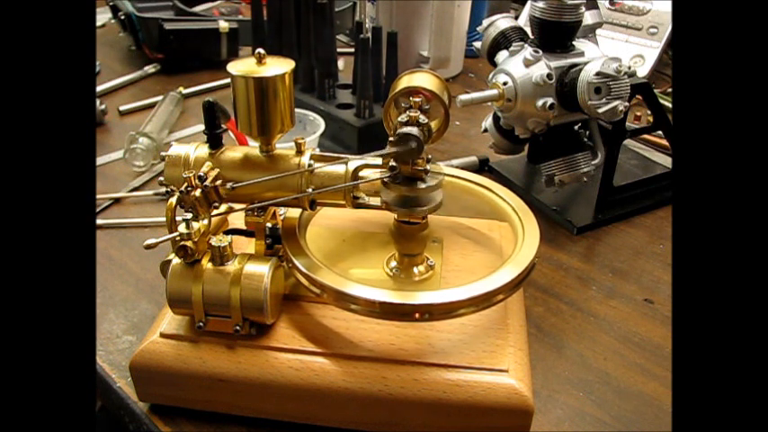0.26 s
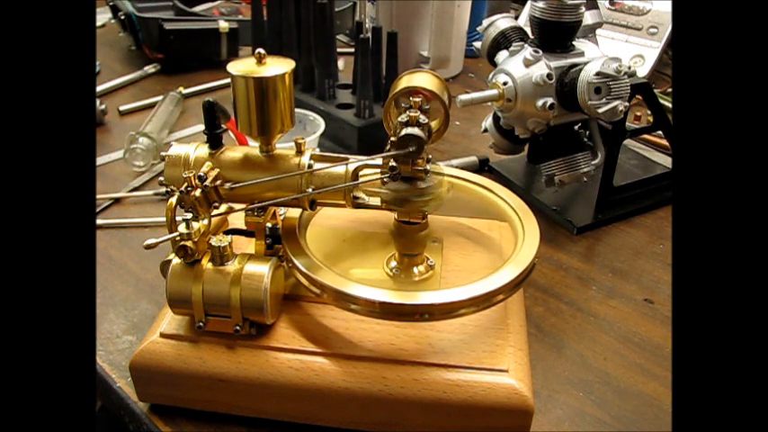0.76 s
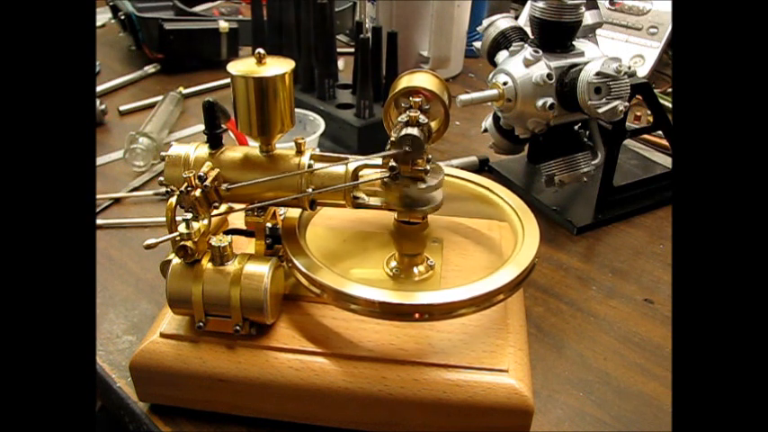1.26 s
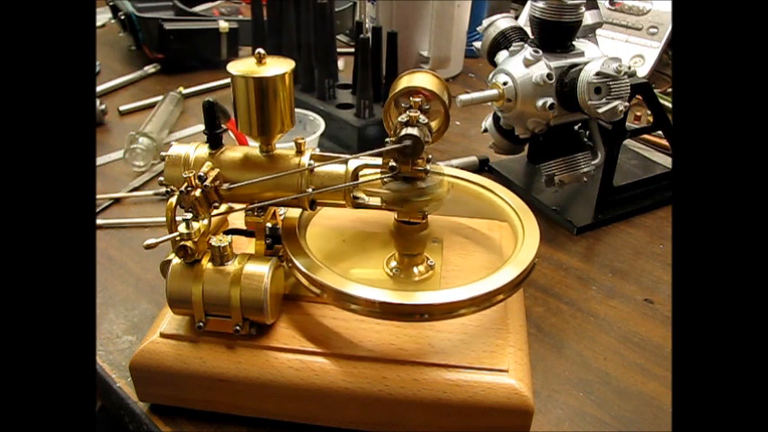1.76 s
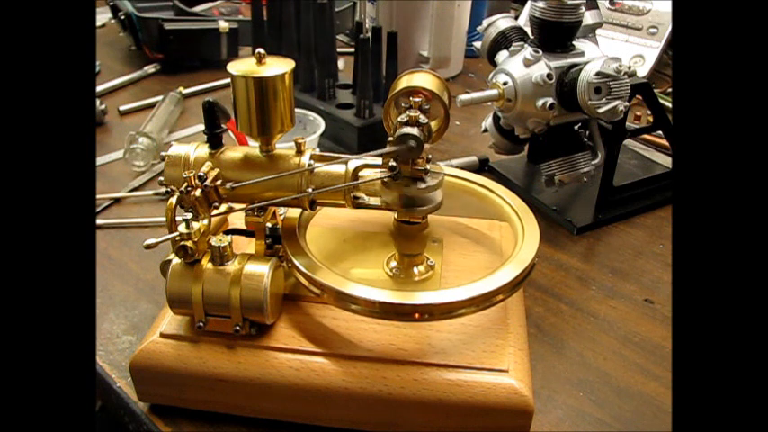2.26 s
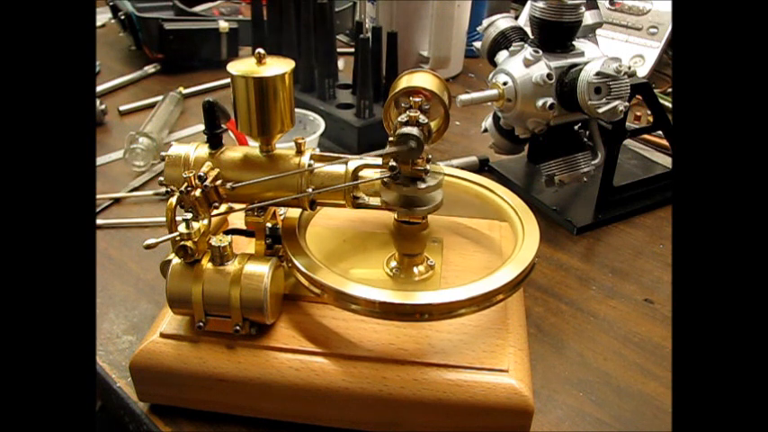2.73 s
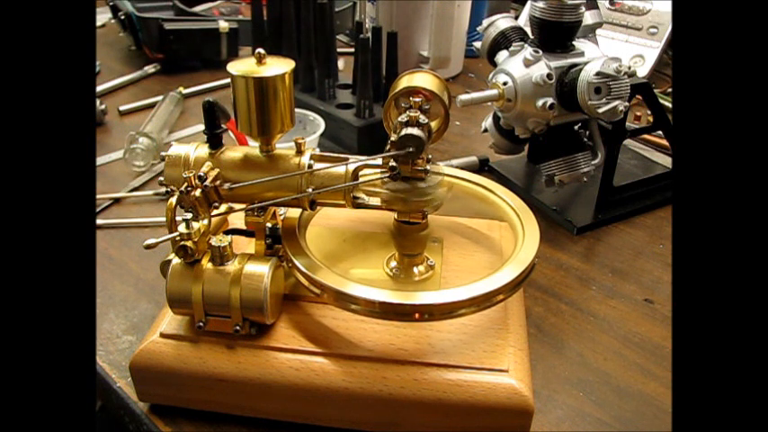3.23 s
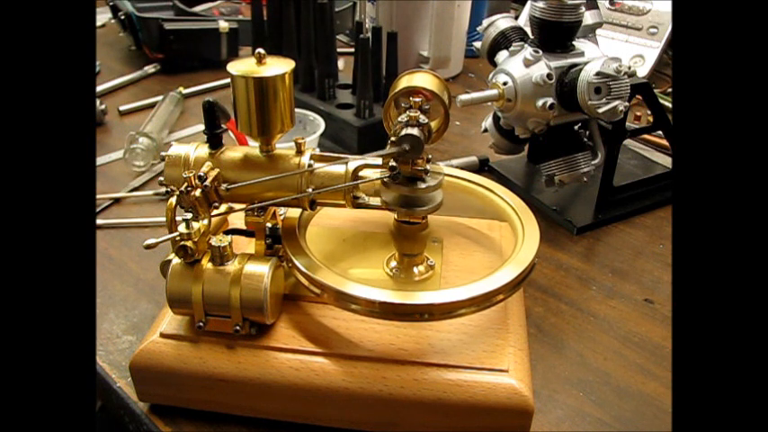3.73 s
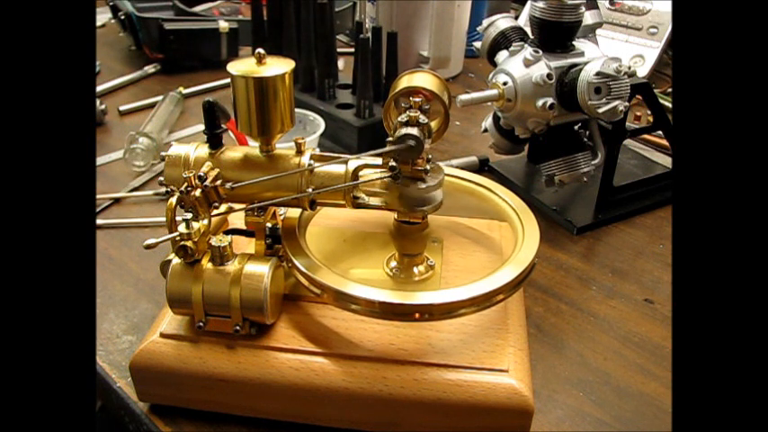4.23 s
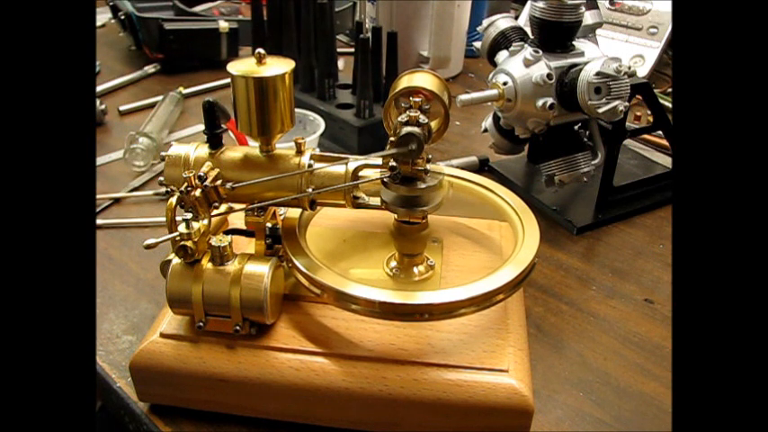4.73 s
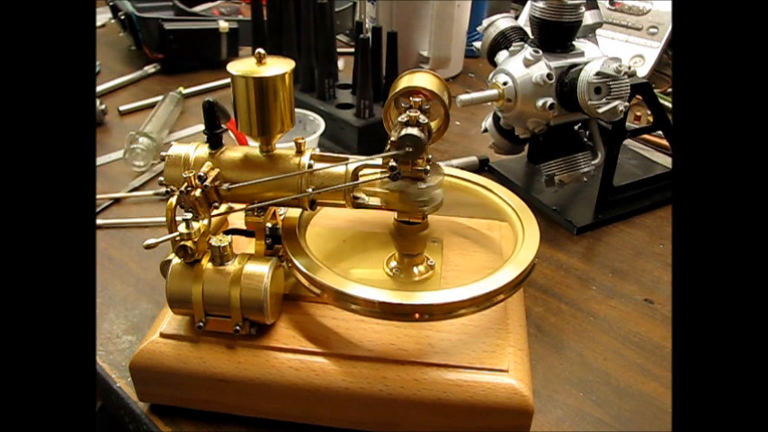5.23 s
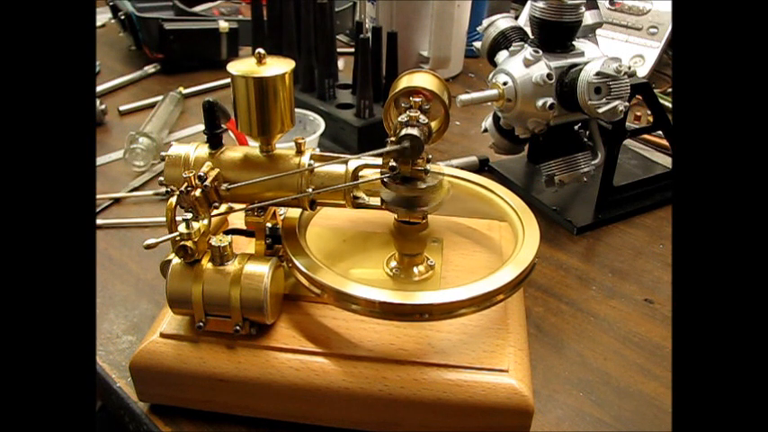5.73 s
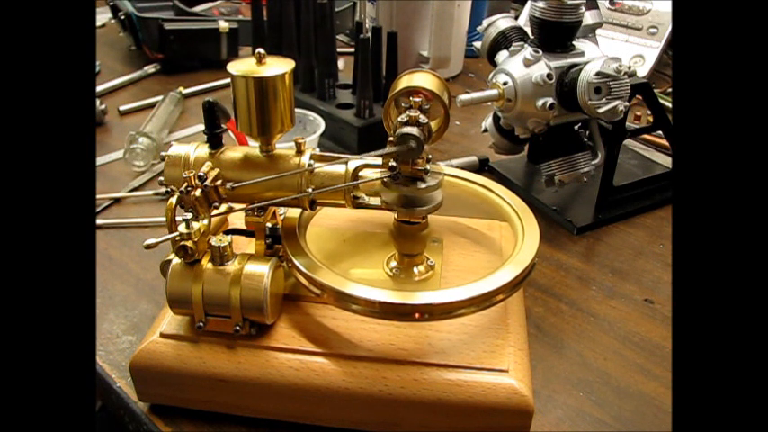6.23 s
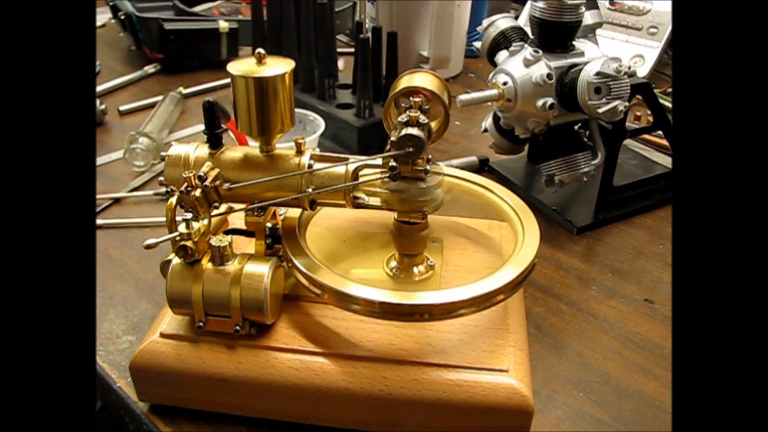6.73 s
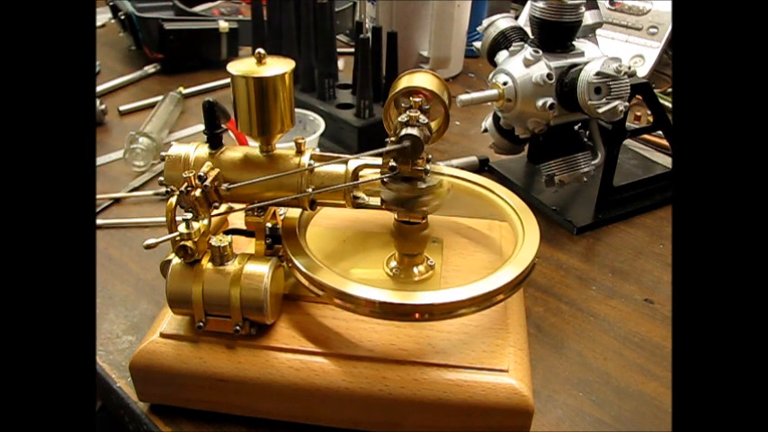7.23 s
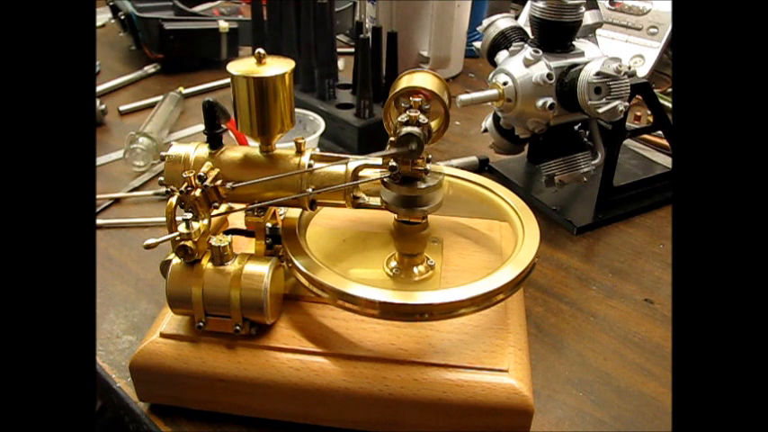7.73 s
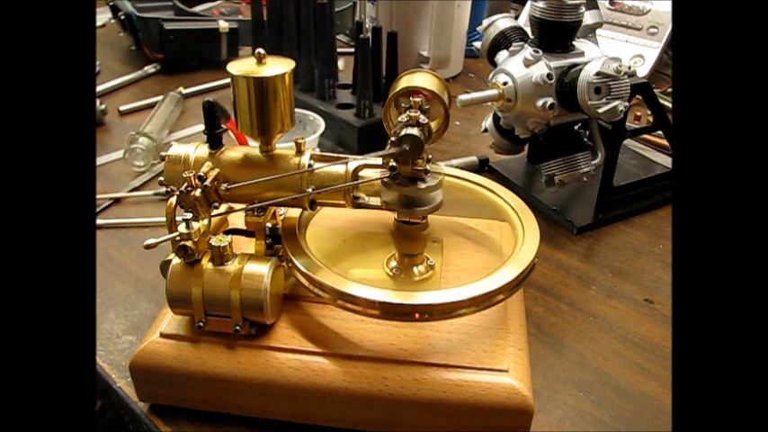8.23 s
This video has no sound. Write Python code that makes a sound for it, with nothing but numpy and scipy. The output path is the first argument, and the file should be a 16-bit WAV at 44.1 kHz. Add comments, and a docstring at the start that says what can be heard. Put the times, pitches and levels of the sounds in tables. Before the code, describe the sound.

Close to the microphone in a dry workshop, a little brass engine on a wooden base keeps up a rapid string of sharp beats. It fires two or three times a second with a ringing thump, knocking more softly in between. Rods rub and clatter, the valve ticks and air puffs faintly throughout, over a low rumble and a quiet flywheel whirr.

```python
"""A thump and a bright brass ring, close up: a small single-cylinder model engine fires on its plinth.
After each firing it coasts for one or two ever slower turns, each with a softer knock.
In every turn the valve gear ticks, air hisses at the cylinder and the linkage rubs and clatters.
Underneath, the bench rumbles and the flywheel whirrs; a dry workshop answers."""
import sys
import numpy as np
from scipy import signal
from scipy.fft import rfft, irfft
from scipy.io import wavfile

SR = 44100
rng = np.random.default_rng(int(sys.argv[2]) if len(sys.argv) > 2 else 0)


def output_pcm(signal):
    """Save a mono or channel-first signal as 16-bit PCM at the path in sys.argv[1].

    Samples are clipped to [-1, 1] before scaling.
    """
    pcm = np.clip(np.atleast_2d(signal).T, -1, 1) * 32767
    wavfile.write(sys.argv[1], SR, np.round(pcm).astype(np.int16))


N = 373968

TURN_S = .152  # a usual flywheel turn
THUMP_LAG_S = .0017  # short delay from each listed firing time to its thump
PLAY_S = .0016  # the unloaded piston takes up its play this far into a turn
LAND_AT, PUFF_AT, DEAD_CENTRE_AT, LIFT_AT = .25, .365, 0.91, .934  # shares of a turn

# firings: t/s, then accent/dB (against the column's mean) of force, frame, crack and low brass ring
FIRINGS = [(0.072, -2.5, -17.5, -19.5, -22.5), (0.373, -5.5, -20, -18.5, -24), (0.693, 2.5, -17, -16, -26),
           (0.994, 1.5, -14.5, -20, -17.5), (1.309, 0, -15, -18, -23.5), (1.616, -2, -14, -23, -22.5),
           (2.084, -3.5, -23.5, -12, -14.5), (2.379, -7.5, -21, -17.5, -30),
           (2.69, -1.5, -17.5, -19, -24.5), (2.998, -6.5, -25.5, -16.5, -18.5),
           (3.469, -1, -22.5, -16, -20.5), (3.759, 1, -16, -18.5, -17), (4.052, -0.5, -17.5, -20.5, -16.5),
           (4.528, -5.5, -21, -18.5, -20.5), (4.994, -2.5, -15, -19.5, -16), (5.45, -2, -19, -29, -18.5),
           (5.903, -2.5, -13.5, -29, -19.5), (6.191, -2.5, -14.5, -30, -21.5),
           (6.652, -4.5, -20, -19.5, -15), (7.099, -1.5, -15, -24, -22.5), (7.541, -1.5, -18, -43, -14),
           (7.978, -1.5, -15.5, -24, -15.5), (8.419, -3.5, -19.5, -19.5, -21.5)]
# relative length of the firing turn and the two coasting turns
TURN_LENGTHS = [1, 1.095, 1.16]
# valve gear landing in those three turns: level/dB
LANDING_DB = [-12.5, -10.5, -3.5]
# where loose joints touch: share of the turn, level/dB
JOINTS = [(0.468, -17.5), (.513, -14.5), (0.595, -19.5), (0.685, -17.5), (0.736, -19), (0.795, -25),
          (.845, -43.5), (0.954, -28)]
# how hard the linkage works: t/s, level/dB (against the mean)
EFFORT = [(0.0, -41.5), (0.78, -40), (1.98, -42), (3.92, -38.5), (4.37, -46.5), (4.67, -42.5),
          (6.82, -44.5), (8.48, -43)]
# resonances: f/Hz, width/Hz, level/dB
PLINTH_MODES = [(260, 81, 11), (566, 233, 12), (737, 118, 11), (850, 86, 6.5)]  # knock of the wooden plinth
FRAME_MODES = [(1098, 68, 14.5), (1165, 50.2, 18), (1360, 14, -9)]  # hollow ring of the frame
CRACK_MODES = [(1505, 120, 3), (1888, 230, 6.5), (2340, 300, 1.5), (2800, 130, -9), (3640, 220, -5),
               (4480, 910, 7)]  # short crack of rod and bearings
BRASS_MODES = [(5113, 114, -1.5), (5204, 113, -3.5), (9430, 150, -5), (9890, 550, -5), (10940, 140, -10.5),
               (11640, 160, -3), (12850, 350, -8.5), (15800, 460, -6)]  # bright ring of the cylinder
VALVE_MODES = [(1040, 110, -30.5), (2180, 126, 14), (2756, 280, -0.5), (3640, 260, -1.5), (5050, 550, 8),
               (5713, 440, -13), (7260, 190, 7), (8900, 470, -10), (10600, 91, 5.5), (11200, 350, -12),
               (14200, 3000, -8)]  # tick of the valve gear
LINK_MODES = [(931.5, 69, 14), (1478, 66, 11.5), (1807, 99, 8), (2100, 180, -0.5), (2893, 60, 9.5),
              (3274, 120, 5.5), (3572, 350, 10.5), (3910, 160, 0), (4650, 400, 7.5), (5140, 220, -12),
              (6400, 410, -41), (6980, 65, -3), (10400, 480, -5.5), (11400, 350, -9), (16700, 4000, -7.5)]  # clatter of rods and links
RUMBLE_MODES = [(85.3, 16, 6), (116.6, 20, 3.5), (191, 27, 6.5), (313, 72, -7.5), (590, 63, -17),
                (736, 160, 1), (870, 20, -2), (1020, 46, -3)]  # bench and plinth stirred by the bearings
WHIRR_MODES = [(987, 15.3, 0), (1408, 21, -9)]  # whirr of the flywheel
BOOM_MODES = [(88.5, 14, 0.5), (119, 25, 2.5), (200.7, 11.4, 8.5), (261.4, 20.5, -2), (399, 3.2, -13),
              (544.7, 12, -0.5)]  # bench top booming after a blow
# noise colours: f/Hz, level/dB
AIR_SPECTRUM = [(1500, -10), (3000, -10.5), (5500, -3.5), (6700, 2), (7700, -3), (9500, -5), (11500, -5.5),
                (13800, -5), (16000, -8)]  # hiss at the valve
AMBIENCE_SPECTRUM = [(20, 30), (50, 2), (100, 1), (300, 2), (1000, -33), (3000, -53), (16000, -70)]  # low workshop background
TAIL_SPECTRUM = [(150, -6), (300, 0), (600, -6.5), (1100, -1.5), (1700, -5.5), (3500, -4.5), (5100, -4),
                 (9000, -1.5), (16000, -0.5)]  # the workshop's reverb tail
# stereo image of the noise: f/Hz, left-right correlation
LIKENESS = [(30, 0.77), (100, 1), (500, 0.94), (1200, 0.92), (2500, 0.81), (5000, 0.53), (9000, 0.61),
            (15000, 0.2)]
# echoes off the bench top and nearby things: t/s, gain
ECHOES = [(.0036, 0.11), (.0053, 0.036), (0.0134, 0.057), (0.02, 0.061), (0.032, 0.17)]
UPPER_BRASS = np.array(BRASS_MODES)[:, 0] > 7000  # the sheen above the main ring


def firings(thump_db=-6.5, thump_s=0.00019, slam_lag_s=0.0007, rasp_db=-4.5):
    """The charge goes off as a pressure pulse; the piston slams the bearings, rod rasps, brass rings."""
    out = np.zeros((2, N))
    from_peak_s = np.arange(1024) / SR - THUMP_LAG_S - thump_s
    pulse = -np.exp(-.5 * (from_peak_s / thump_s) ** 2)
    thump = left_first(cut(pulse, hz=118.5, kind="high"))
    rows = np.array(FIRINGS)
    accents = rows[:, 1:] - rows[:, 1:].mean(axis=0)
    for s, (force, frame, crack, ring) in zip(rows[:, 0], accents):
        force_db = 0.47 * force
        add(out, s, from_db(thump_db + force_db) * thump)
        slam_s = s + THUMP_LAG_S + slam_lag_s
        add(out, slam_s, knock(4.5 + force_db, 9.0 + frame, 5.0 + crack, soft_hz=2550))
        rasp = unit_energy(cut(chatter(0.00071), hz=4400, kind="low"))
        add(out, slam_s, from_db(rasp_db + crack) * rasp)
        ring_db = np.where(UPPER_BRASS, force_db - 0.1, ring + 1.0)
        add(out, slam_s, brass_ring(ring_db, peak_s=0.00074, spread_db=1.5, detune=0.012))
    return out


def knock(plinth_db, frame_db, crack_db, soft_hz):
    """One clean blow into plinth, frame and rod, rounded by the softness of the contact."""
    click = cut(signal.unit_impulse(4096), soft_hz, "low", order=1)
    parts = [(plinth_db, PLINTH_MODES), (frame_db, FRAME_MODES), (crack_db, CRACK_MODES)]
    return left_first(sum(from_db(db) * resonate(click, modes) for db, modes in parts))


def brass_ring(levels_db, peak_s, spread_db=-0.5, detune=0.0036):
    """A buzzing contact rings the cylinder, every mode with its own strength and tuning."""
    contact = chatter(peak_s)
    out = 0
    for level, (hz, width, db) in zip(levels_db, BRASS_MODES):
        mode = (hz * (1 + detune * rng.normal()), width, 0)
        gain = from_db(level + db + spread_db * rng.normal())
        out = out + gain * unit_energy(resonate(contact, [mode]))
    return out


def flywheel_turns():
    """The flywheel slows over two or three turns per firing. Rows: start/s, length/s, turns coasted."""
    fired = np.array(FIRINGS)[:, 0] + THUMP_LAG_S
    fired = np.r_[fired[0] - 2 * TURN_S, fired, fired[-1] + 2 * TURN_S]
    turns = []
    for start, end in zip(fired, fired[1:]):
        shares = np.array(TURN_LENGTHS[:round((end - start) / TURN_S)])
        lengths = shares * (end - start) / shares.sum()
        turns += zip(start + np.cumsum(lengths) - lengths, lengths, range(len(lengths)))
    return turns


def coasting_knocks(turns, spread_db=1.73):
    """Unfired, the piston only takes up its play: a softer knock, and the brass sings on faintly."""
    out = np.zeros((2, N))
    for s in [start + PLAY_S for start, _, coasted in turns if coasted]:
        accent_db = 0.23 * effort_db(s) + spread_db * rng.normal()
        crack_db = accent_db - 3.0 + 0.74 * effort_db(s)
        add(out, s, knock(accent_db - 2.0, accent_db + 1.0, crack_db, soft_hz=2600))
        add(out, s, brass_ring(accent_db - 10.0 - 8.0 * UPPER_BRASS, peak_s=0.00098))  # attack
        add(out, s, brass_ring(accent_db - 15.5 - 8.5 * UPPER_BRASS, peak_s=0.011))  # lingering sheen
    return out


def valve_gear(turns, lift_db=-14.5, bounce_db=-12.0, buzz_s=0.00054, spread_db=1.14):
    """The gear ticks up before a coasting turn; every turn it lands and bounces, harder when coasting."""
    out = np.zeros((2, N))
    for start, length, coasted in turns:
        early_s = 0 if coasted else .002
        contacts = [(start + LAND_AT * length - early_s, LANDING_DB[coasted], buzz_s)]
        if coasted:
            contacts.append((start - (1 - LIFT_AT) * length, lift_db, 0.0017))
        for s, db, peak_s in contacts:
            db = db + 0.45 * effort_db(s) + spread_db * rng.normal()
            tick = unit_energy(resonate(chatter(peak_s), VALVE_MODES))
            add(out, s, from_db(db) * tick)
            bounce_s = s + 0.0032 * rng.uniform(0.72, 5.0)
            bounce = unit_energy(resonate(chatter(buzz_s), VALVE_MODES))
            add(out, bounce_s, from_db(db + bounce_db) * bounce)
    return out


def joint_clatter(turns, scatter=0.0094, spread_db=1.5):
    """Each loose joint clacks once a turn, never quite at the same point or strength."""
    contacts = np.zeros((2, N))
    for start, length, _ in turns:
        for share, db in JOINTS:
            s = start + length * (share + scatter * rng.normal())
            gain = from_db(db + effort_db(s) + spread_db * rng.normal())
            add(contacts, s, gain * chatter(0.00049, size=512))
    link_gain = np.linalg.norm(resonate(signal.unit_impulse(2048), LINK_MODES))
    return resonate(contacts, LINK_MODES) / link_gain


def rod_rub(angle, grit, load_db, level_db=-47.0, grain_db=5.0):
    """The rods rub grittily, fall quiet at both dead centres and are shaken by each knock."""
    near_dip_db = -7.5 * swell(angle, DEAD_CENTRE_AT, width=0.048)
    far_dip_db = -4.0 * swell(angle, DEAD_CENTRE_AT - .5, width=0.048)
    shake_db = 11.5 * swell(angle, centre=0.012, width=0.035)
    rub = rms_one(resonate(noise() * from_db(grain_db * grit), LINK_MODES))
    return from_db(level_db + load_db + near_dip_db + far_dip_db + shake_db) * rub


def air_puff(angle, grit, level_db=-38.5, grain_db=1.5):
    """Air hisses through the open valve once a turn."""
    opening = swell(angle, PUFF_AT, width=0.081)
    return from_db(level_db + grain_db * grit) * opening * noise(N, AIR_SPECTRUM)


def bearings(angle, load_db, rumble_db=-46.5, whirr_db=-50.0, stroke_db=3.0):
    """The bench rumbles and the flywheel whirrs, most at mid-stroke and under load."""
    throb_db = -stroke_db * np.cos(2 * np.pi * 2 * (angle - DEAD_CENTRE_AT))
    rumble = from_db(rumble_db + 0.7 * load_db) * rms_one(resonate(noise(), RUMBLE_MODES))
    whirr = from_db(whirr_db + 0.8 * load_db) * rms_one(resonate(noise(), WHIRR_MODES))
    return from_db(throb_db) * (rumble + whirr)


def workshop(x, tail_db=-8.0, t60_s=0.25, build_s=0.0017, size=16384):
    """The bench booms under the sound; a few dull early echoes lead into a short diffuse tail."""
    age = np.arange(size) / SR
    envelope = from_db(-60 * age / t60_s) * (1 - np.exp(-(age / build_s) ** 2))
    tail = unit_energy(noise(size, TAIL_SPECTRUM) * envelope)
    early = np.zeros(size)
    for s, gain in ECHOES:
        early[round(s * SR)] += gain
    response = from_db(tail_db) * tail + cut(early, hz=4500, kind="low", order=1)
    return x + resonate(x, BOOM_MODES) + signal.fftconvolve(x, response, axes=-1)[:, :N]


def effort_db(s):
    """Load on the linkage at time s, against its usual load."""
    times, db = np.transpose(EFFORT)
    return np.interp(s, times, db - db.mean())


def swell(angle, centre, width):
    """A bell of height 1 around one point of the turn; all arguments in turns."""
    distance = (angle - centre + .5) % 1 - .5
    return np.exp(-.5 * (distance / width) ** 2)


def chatter(peak_s, size=2048):
    """A brief buzzing contact that peaks at peak_s and dies away."""
    age = np.arange(size) / SR / peak_s
    return unit_energy(noise(size) * age * np.exp(-age))


def noise(size=N, spectrum=((20, 0), (20000, 0))):
    """Coloured stereo noise, narrow in the bass and wide in the treble; rms 1."""
    hz = np.arange(size // 2 + 1) * SR / size
    alike = np.clip(at_hz(LIKENESS, hz), -1, 1)
    mid, side = rfft(rng.standard_normal((2, size)))
    pair = np.sqrt(1 + alike) * mid + np.sqrt(1 - alike) * side * [[1], [-1]]
    return rms_one(irfft(pair * from_db(at_hz(spectrum, hz)), size))


def resonate(x, modes):
    """Rings a bank of parallel resonances."""
    out = 0
    for hz, width, db in modes:
        r = np.exp(-np.pi * width / SR)
        poles = [1, -2 * r * np.cos(2 * np.pi * hz / SR), r * r]
        out = out + from_db(db) * (1 - r * r) / 2 * signal.lfilter([1, 0, -1], poles, x + 1e-18)
    return out


def cut(x, hz, kind, order=2):
    """Low-pass or high-pass."""
    return signal.sosfilt(signal.butter(order, hz, kind, fs=SR, output="sos"), x)


def at_hz(points, hz):
    """Reads a table along a logarithmic frequency axis."""
    table_hz, values = np.transpose(points)
    return np.interp(np.log(hz + 1), np.log(table_hz), values)


def from_db(db):
    """Decibels to gain."""
    return 10 ** (np.asarray(db) / 20)


def unit_energy(x):
    """Scales a one-shot so that its squares sum to 1 in an average channel."""
    return x / np.sqrt(np.mean(np.sum(x ** 2, axis=-1)) + 1e-20)


def rms_one(x):
    """Scales a steady sound to rms 1."""
    return x / np.sqrt(np.mean(x ** 2) + 1e-20)


def pan(x, left_db):
    """Lifts the left side over the right by left_db."""
    return x * from_db([[left_db / 2], [-left_db / 2]])


def left_first(x):
    """A mono sound reaches the left side two samples before the right."""
    return np.stack([x, np.r_[0, 0, x[:-2]]])


def add(out, s, sound):
    """Mixes a one-shot in at time s, if that lies within the scene."""
    start = round(s * SR)
    if 0 <= start < N:
        out[..., start:start + sound.shape[-1]] += sound[..., :N - start]


def scene():
    """The firings set the flywheel's pace and the moving parts follow the crank, over a low room bed."""
    turns, t = flywheel_turns(), np.arange(N) / SR
    starts = [start for start, _, _ in turns]
    angle = np.interp(t, starts, np.arange(len(turns))) % 1  # crank position in turns
    load_db = effort_db(t)
    grit = rms_one(cut(rng.standard_normal(N), hz=336, kind="low"))  # grain shared by rods and air
    knocks = pan(firings() + coasting_knocks(turns), left_db=-.3)
    linkage = pan(joint_clatter(turns) + rod_rub(angle, grit, load_db), left_db=-3.0)
    ticks = pan(valve_gear(turns), left_db=-1.5)
    air = pan(air_puff(angle, grit), left_db=2.5)
    engine = workshop(knocks + linkage + ticks + air) + bearings(angle, load_db)
    return engine + from_db(-48.5) * noise(N, AMBIENCE_SPECTRUM)


def record(dry, low_cut_hz=47.7, high_cut_hz=15900):
    """Rolls off the sub-bass, soft-clips the peaks and cuts the very top."""
    rounded = 1.517 * np.tanh(cut(dry, low_cut_hz, "high") / 1.683)
    return signal.sosfilt(signal.ellip(10, .3, 70, high_cut_hz, fs=SR, output="sos"), rounded)


dry = scene()
out = record(dry)
output_pcm(out)
```